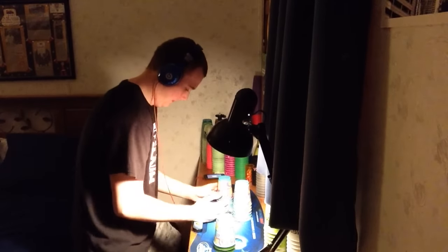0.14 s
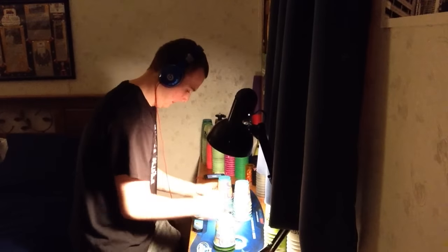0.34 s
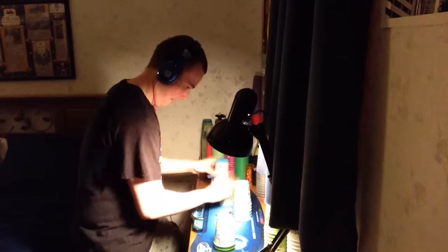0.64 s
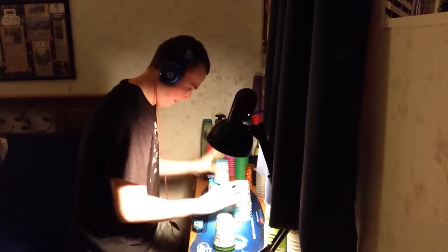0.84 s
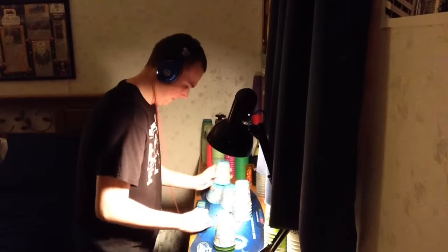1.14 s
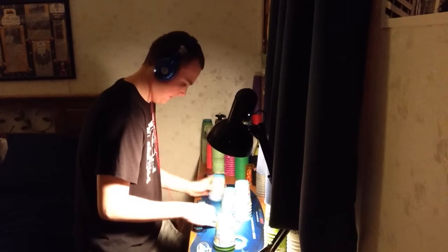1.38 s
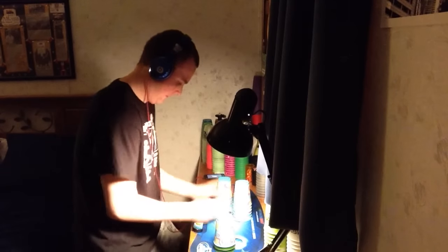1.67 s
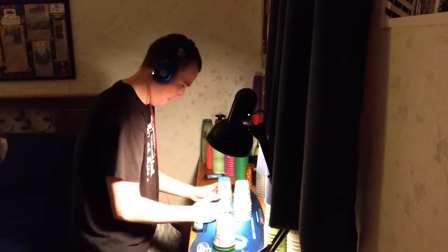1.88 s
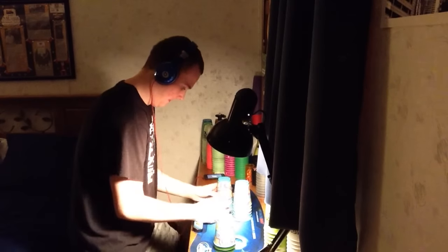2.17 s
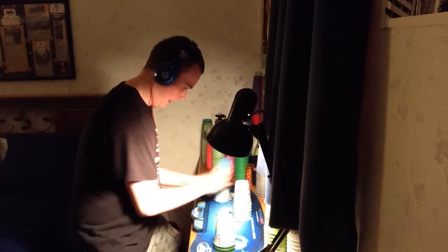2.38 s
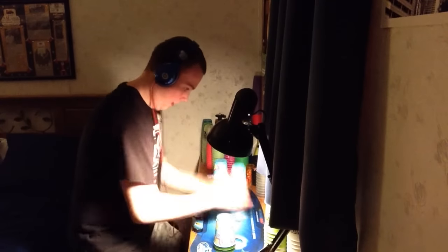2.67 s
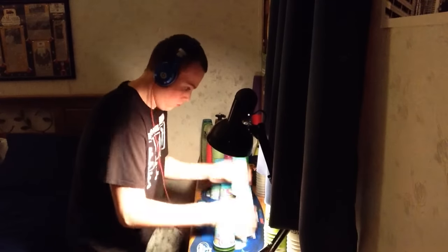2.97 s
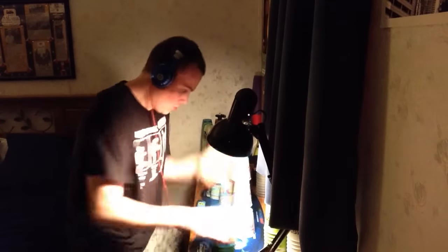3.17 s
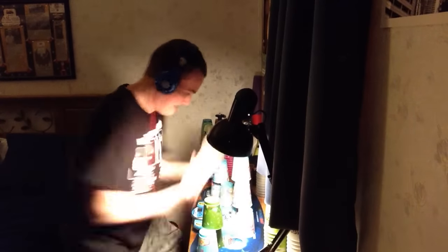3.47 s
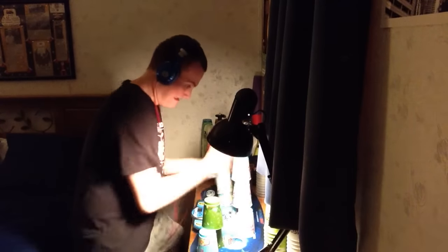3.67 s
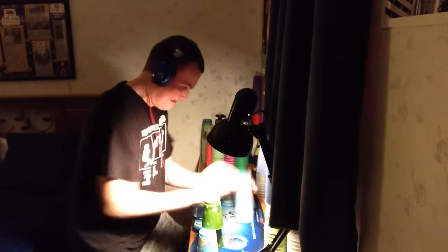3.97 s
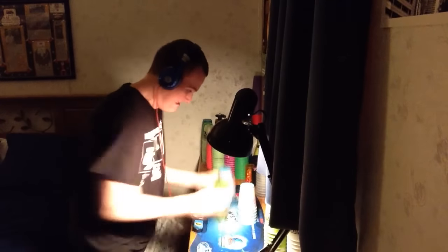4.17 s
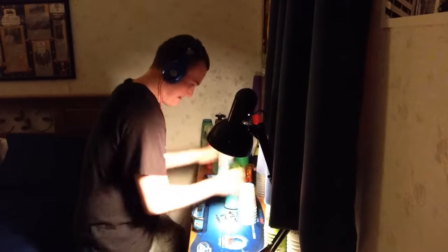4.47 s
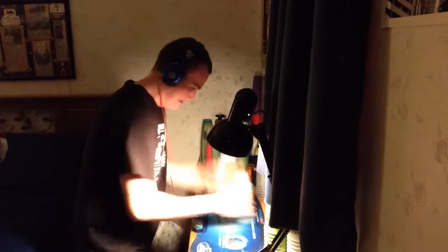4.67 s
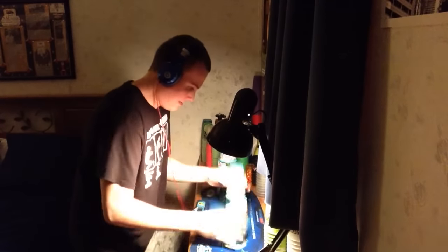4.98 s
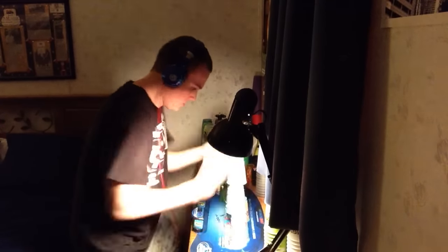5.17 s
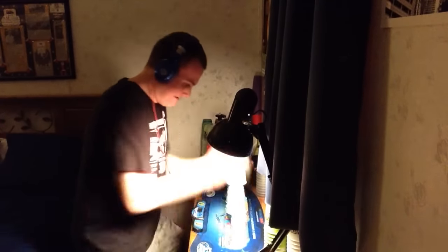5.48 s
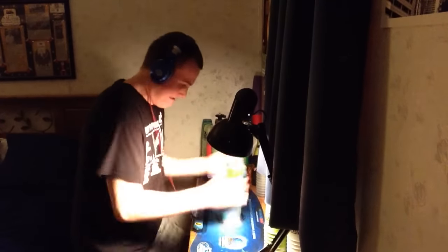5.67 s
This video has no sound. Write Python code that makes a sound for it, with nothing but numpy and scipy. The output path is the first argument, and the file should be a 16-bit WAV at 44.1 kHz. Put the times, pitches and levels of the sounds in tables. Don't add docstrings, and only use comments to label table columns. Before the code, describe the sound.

A quiet small bedroom with a faint low hum, heard through a small, thin-sounding microphone some distance away. Plastic cups slide softly and are set down around 0.2 and 0.45 seconds, then a loud hollow pop and clack lands near 0.7. Lighter cracks follow around 1.0 to 1.2, and another clacking group at 1.4 to 1.75. After a near pause, small ticks lead to a strong hollow pop at 2.55. From about 2.7 ticks and rattles build; sharp, higher pops hit at 3.1, and a hard cluster at 3.4. A pile tumbles in a rapid clatter at 3.8 to 3.9, followed by cracks and a desk thump near 4.05. More knocks come at 4.2 and 4.5, with a brief easing before dense hits and rattling slides from 5.05 to 5.5. A second, heavier pile collapse rattles down at 5.55, then scattered clicks finish, with short room echoes.

```python
import sys
import numpy as np
from scipy import signal
from scipy.io import wavfile

SR = 44100
rng = np.random.default_rng(int(sys.argv[2]) if len(sys.argv) > 2 else 0)


def boost_factor(decibels):
    exponent = np.asarray(decibels, float) / 20
    return 10 ** exponent


def master(y):
    cut = np.clip(np.atleast_2d(y).T, -1, 1)
    pcm = np.round(cut * 32767)
    wavfile.write(sys.argv[1], SR, pcm.astype(np.int16))


N = 257544


def rms_one(x):
    return x / np.sqrt(np.mean(x ** 2) + 1e-20)


def at_hz(points, hz):
    table_hz, values = np.transpose(points)
    return np.interp(np.log(hz), np.log(table_hz), values)


def cut(x, hz, kind):
    return signal.sosfilt(signal.butter(2, hz, kind, fs=SR, output="sos"), x)


def ring(force, hz, t60):
    r, w = boost_factor(-60 / (t60 * SR)), 2 * np.pi * hz / SR
    return signal.lfilter([0, np.sin(w)], [1, -2 * r * np.cos(w), r * r], force + 1e-18)


def ring_all(force, modes):
    return sum(boost_factor(db) * ring(force, hz, t60) for hz, db, t60 in modes)


def clicks(times, gains):
    out = np.zeros(N)
    np.add.at(out, np.clip((np.asarray(times) * SR).astype(int), 0, N - 1), gains)
    return out


def strike(times, level_db, modes, spread_db):
    luck = rng.standard_normal((len(times), 2, len(modes)))
    gains = boost_factor(level_db[:, None] + spread_db * luck[:, 0]) * np.sign(luck[:, 1])
    out = np.zeros(N)
    for k, (hz, db, t60) in enumerate(modes):
        out += boost_factor(db) * ring(clicks(times, gains[:, k]), hz, t60)
    return out


def octave_noise(size, shape):
    white = rng.standard_normal((2, size))
    edges = 35 * 2 ** np.arange(0, 9.1, .5)
    out = np.zeros(size)
    for k, (low, high) in enumerate(zip(edges, edges[1:])):
        out += shape(np.sqrt(low * high)) * cut(white[k % 2], [low, high], "band")
    return out


# frequency in Hz, level in dB per Hz.
HUSH = [(24, -63), (40, -33), (115, -18), (176, -2), (467, -20), (556, -3), (965, -20), (2260, -15),
        (2770, -22), (3300, -15), (3740, -18), (14500, -25), (16000, -34)]


def hush():
    air = rms_one(octave_noise(N, lambda hz: boost_factor(at_hz(HUSH, hz))))
    return boost_factor(-64.5) * (air + hum())


# frequency in Hz, level over the hush in dB, t60 in seconds.
HUM = [(180.8, -5, 0.25), (560, -9.5, 0.12)]


def hum():
    return sum(boost_factor(db) * rms_one(ring(rng.standard_normal(N), hz, t60)) for hz, db, t60 in HUM)


# start in seconds, end in seconds, rattle level in dB,
# rim ring over rattle in dB, hollow rub over rattle in dB.
SLIDE = [(-.1, 0.11, -44.5, -22, -7), (0.487, 0.69, -52, -11, 4), (0.983, 1.14, -56.5, 2, 12),
         (1.612, 1.713, -47.5, -15, -6), (2.388, 2.51, -57.5, 4, 0.5), (2.797, 3.01, -52, 2.5, 2),
         (3.104, 3.35, -43.5, 2.5, -2), (3.499, 3.692, -51.5, 15, 4), (3.564, 3.82, -43, -17, -4.5),
         (3.913, 4.1, -42.5, -13, 12), (4.225, 4.5, -61.5, 0, 5.5), (4.784, 4.989, -48.5, 3, -1),
         (5.113, 5.296, -39, -0.5, -0.5), (5.316, 5.442, -34.5, -24, 6), (5.628, 5.95, -38.5, -26, 4.5)]


def slide():
    t = np.arange(N) / SR
    hits = rng.random(N) < 5000 / SR
    grain_size = boost_factor(2.2 * np.minimum(rng.exponential(1, N), 4))
    grains = hits * grain_size * rng.choice([-1, 1], N)
    rattle = rms_one(cut(grains, [1500, 12000], "band"))
    rim = rms_one(ring_all(grains, RIM))
    rub = rms_one(ring(grains, 547.6, 0.046) + ring_all(grains, CUP_WALL))
    out = np.zeros(N)
    for start, end, db, rim_db, rub_db in SLIDE:
        stroke = np.sin(np.pi * np.clip((t - start) / (end - start), 0, 1))
        out += boost_factor(db) * stroke * (rattle + boost_factor(rim_db) * rim + boost_factor(rub_db) * rub)
    return out


# peak time in seconds, peak in dB, cavity in Hz.
SET_DOWNS = [(0.165, -30.5, 584), (0.177, -28.5, 660), (0.189, -26, 540), (0.446, -25.5, 700),
             (0.468, -26, 571), (0.521, -30.5, 610), (0.956, -33.5, 845), (1.077, -26, 824),
             (5.466, -8, 603), (1.444, -13, 650), (1.647, -28.5, 590), (1.694, -29.5, 620),
             (1.751, -22, 1137), (2.399, -35, 590), (2.418, -21.5, 657), (2.869, -26.5, 543),
             (2.9, -21.5, 640), (2.974, -25, 816), (3.011, -25.5, 560), (3.062, -32, 580),
             (3.585, -39, 620), (3.737, -23.5, 620), (3.775, -27.5, 660), (4.1, -12, 776),
             (4.233, -26.5, 566), (4.333, -24, 620), (5.224, -16.5, 1000), (5.379, -25, 563),
             (5.392, -10, 604), (5.454, -7.5, 636)]
# peak time in seconds, peak in dB, cavity in Hz.
BUMPS = [(0.373, -51.5, 880), (0.614, -37, 1034), (0.701, -5.5, 654), (0.976, -33, 625), (2.458, -32, 677),
         (2.716, -29, 500), (2.762, -21.5, 620), (3.082, -13.5, 1005), (3.124, -8, 1000),
         (3.176, -22.5, 935), (3.298, -36.5, 865), (3.436, -10.5, 637), (3.564, -41, 1300),
         (4.071, -17.5, 1040), (4.114, -20, 795), (4.519, -19.5, 1020), (4.547, -18, 980),
         (4.591, -13.5, 984), (4.718, -34, 650), (4.882, -34.5, 760), (4.911, -29.5, 584),
         (4.966, -36.5, 1030), (5.094, -20.5, 960), (5.148, -15, 890), (5.279, -15.5, 820),
         (5.288, -18, 780), (5.367, -26, 780), (5.681, -25, 567), (5.733, -39, 780), (5.799, -20, 510)]
# contact time in seconds, pop in dB, cavity in Hz, crack in dB.
KNOCKS = [(0.676, -6.5, 600, -22.5), (1.0375, -20.5, 860, -22), (1.154, -13, 966, -13),
          (1.1771, -15.5, 850, -14.5), (1.4042, -33.5, 640, -21), (1.6097, -30.5, 620, -15),
          (1.709, -20, 610, -21.5), (1.7299, -24, 640, -10.5), (2.519, -28, 570, -16),
          (2.561, -3, 628, -29), (2.849, -34, 780, -30), (2.9392, -25.5, 1000, -48), (3.1091, -9, 1090, -4),
          (3.327, -15, 1010, -42), (3.397, -16, 535, -37), (3.4141, -10.5, 584, -5),
          (3.617, -15.5, 605, -13), (3.9469, -15, 1060, -8), (4.0205, -10, 589, -4.5),
          (4.081, -13.5, 527, -3.5), (4.1785, -21.5, 573, -8), (4.48, -27.5, 620, -19.5),
          (4.5707, -9.5, 578, -8), (4.765, -33, 550, -18), (5.036, -24.5, 560, -45),
          (5.1177, -8, 690, -6.5), (5.293, -9, 627, -3.5), (5.3274, -10.5, 667, -6), (3.857, -12, 673, -9),
          (5.746, -20.5, 657, -30)]
# peak time in seconds, peak in dB, cavity in Hz.
NESTINGS = [(1.391, -44, 690), (1.429, -30, 610), (2.579, -12, 620), (3.101, -15, 560), (3.246, -34, 480),
            (3.606, -21.5, 776), (3.788, -31, 590), (4.014, -23, 616), (4.426, -39.5, 630),
            (4.773, -18, 550), (5.241, -24, 960), (5.831, -26, 527)]


def pop_rows():
    # events, wall modes over cavity tone (dB), length of a 600 Hz pop (ms), timed at contact
    kinds = [(KNOCKS, -6.5, 13.7, True), (falling_cups(), -5, 18, True),
             (SET_DOWNS, -19, 15.43, False), (BUMPS, -7, 16.6, False), (NESTINGS, -16, 15.86, False)]
    rows = []
    for table, wall_db, ms, struck in kinds:
        for s, db, hz, *_ in table:
            length = np.clip(ms * (600 / hz) ** 0.6, 4, 45) / 1000
            peak_s = s + struck * 0.328 * length
            rows.append((peak_s, db, hz, wall_db, length))
    return rows


def puffs(s, gain, hz, length_s):
    out = np.zeros(N + SR)
    for at, g, f, length in zip(s, gain, hz, length_s):
        t = np.arange(int(length * SR)) / SR
        start = int((at - .37 * length) * SR)
        swell = np.sin(np.pi * (t / length) ** .7) ** 2
        out[start:start + len(t)] += g * swell * np.sin(2 * np.pi * f * t)
    return out[:N]


# frequency in Hz, level in dB, t60 in seconds.
CUP_WALL = [(395, -24, 0.028), (453.4, -12.5, 0.051), (780, 7, 0.018), (904, -7.5, 0.038),
            (1030, -3.5, 0.081), (1220, 6, 0.0037), (1172, -6, 0.047), (1760, -14, 0.0043)]


def pops():
    s, peak_db, hz, wall_db, length_s = np.transpose(pop_rows())
    cavity = puffs(s, boost_factor(peak_db + 1.25), hz, length_s)
    wall = strike(s - 0.295 * length_s, peak_db + wall_db, CUP_WALL, spread_db=3.5)
    return cavity, cut(wall, [330, 1500], "band")


# time in seconds, peak in dB.
THUMPS = [(0.167, -23.5), (0.445, -22.5), (0.676, -20), (1.162, -30.5), (1.438, -23.5), (1.731, -19.5),
          (2.518, -37), (2.567, -17), (2.701, -33.5), (2.752, -30), (2.863, -35), (3.001, -27.5),
          (3.101, -32), (3.243, -26), (3.403, -13.5), (3.627, -28), (4.067, -9.5), (4.121, -36),
          (4.19, -20), (4.327, -28.5), (4.57, -26.5), (4.713, -30), (4.766, -31), (4.887, -32),
          (5.031, -25.5), (5.111, -27), (5.299, -14.5), (5.339, -20), (5.459, -9.5), (5.789, -39)]


def thump_rows():
    rows = list(THUMPS)
    for s, gap, _, _, desk_db in COLLAPSES:
        for cup in (len(PILE) // 2, len(PILE) - 1):
            rows.append((s + cup * gap, desk_db))
    return rows


# frequency in Hz, level in dB, t60 in seconds.
DESK = [(108, -1.5, 0.073), (181.5, 7, 0.057), (226.8, -5.5, 0.24), (350, -9.5, 0.1), (394, -1, 0.048)]


def thumps():
    s, peak_db = np.transpose(thump_rows())
    desk = strike(s, peak_db - 4.0, DESK, spread_db=4.0)
    return cut(cut(desk, 350, "low"), 370, "low")


# peak time in seconds, peak in dB, low clack over whole in dB.
CLACKS = [(0.3698, -37.5, -3.5), (0.4883, -46, -13), (0.509, -34, -6), (0.683, -3.5, -17),
          (1.437, -4.5, -0.5), (1.7293, -9, 6.5), (1.0051, -46.5, -11), (1.6378, -31, -12),
          (2.414, -45.5, 0), (2.57, -5.5, -9), (2.9394, -20, 4), (3.3287, -20, -31), (3.4038, -14, -2.5),
          (3.428, -16, 1), (4.1185, -11.5, -23), (4.5124, -19, -22), (5.0785, -23.5, -16),
          (5.3653, -10.5, -3), (5.3869, -12, 4), (5.4602, -3, -4), (5.6384, -8.5, 0), (5.75, -16, -1.5),
          (5.7672, -24.5, 4), (5.8232, -19, 3)]
# peak time in seconds, peak in dB.
TICKS = [(0.5629, -33.5), (0.5804, -24.5), (0.6103, -30), (0.9535, -40.5), (1.092, -29.5), (1.2943, -33.5),
         (1.3803, -33), (3.889, -14.5), (1.6885, -34), (2.2473, -46), (2.3876, -39), (2.4463, -33),
         (2.7009, -25), (2.7413, -13.5), (2.864, -28.5), (2.9067, -24), (3.013, -25), (3.0775, -12.5),
         (3.241, -16.5), (3.2893, -16.5), (3.7274, -14), (3.997, -15), (4.329, -35.5), (4.3889, -37),
         (4.7128, -24.5), (5.019, -39), (5.0528, -17), (5.2728, -16.5), (5.4424, -9.5), (5.7845, -10.5)]


def crack_rows():
    rows = [(s, db, -3, -6.5) for s, _, _, db in KNOCKS]
    rows += [(s, db, -6, -2) for s, _, _, db in falling_cups()]
    rows += [(s, db, -2.5, -7) for s, db in TICKS]
    rows += [(s, db, -8, clack_db) for s, db, clack_db in CLACKS]
    return rows


# frequency in Hz, level in dB, t60 in seconds.
RIM = [(2300, -5, .012), (2900, 3, .003), (4400, 3, .002)]


def cracks():
    s, peak_db, bright_db, clack_db = np.transpose(crack_rows())
    fall, rise = boost_factor(-60 / (.016 * SR)), boost_factor(-60 / (.008 * SR))
    edges = 1400 * 2 ** (np.arange(15) / 4)
    splinters = rng.standard_normal((2, N)) * boost_factor(6.1 * rng.standard_normal(N))
    favour_db = 3.5 * rng.standard_normal((len(s), len(edges)))
    out = np.zeros(N)
    for k, band in enumerate(zip(edges, edges[1:])):
        if k < 4:
            part_db = clack_db - 3.0
        elif k < 8:
            part_db = -7.5
        else:
            part_db = bright_db - 1.0 * (k - 6)
        blows = clicks(s, boost_factor(peak_db + part_db + favour_db[:, k] - 9.5))
        burst = signal.lfilter([1 - rise], np.convolve([1, -fall], [1, -rise]), blows)
        out += burst * rms_one(cut(splinters[k % 2], band, "band"))
    return out + boost_factor(-51.5) * ring_all(out, RIM)


# frequency in Hz, level in dB, t60 in seconds.
LIP = [(1884, -9, 0.035), (2337, -7.5, 0.045), (3280, -5.5, 0.03), (4050, -3.5, 0.029), (5400, -2.5, 0.02)]


def lips():
    s, peak_db, *_ = np.transpose(crack_rows())
    return strike(s + 0.001499, peak_db - 17.5, LIP, spread_db=4.5)


# start in seconds, gap between cups in seconds, pop in dB, crack in dB, desk in dB.
COLLAPSES = [
    (3.799, 0.0152, -13.5, -5, -15.5),
    (5.54, 0.0165, -12, -4, -6.5),
]
# cavity in Hz, pop in dB, crack in dB.
PILE = [
    (620, -5, -8),
    (1030, 5, 6),
    (560, -2.5, -3),
    (550, -0.6, 3.5),
    (714, -6, -4),
    (515, -3, -6.5),
    (700, -5.5, 1.5),
]


def falling_cups():
    rows = []
    for s, gap, pop_db, crack_db, _ in COLLAPSES:
        for k, (hz, pop, crack) in enumerate(PILE):
            rows.append((s + k * gap, pop_db + pop, hz, crack_db + crack))
    return rows


# frequency in Hz, t60 in seconds.
ROOM_T60 = [(100, 0.39), (500, 0.2), (2000, 0.19), (8000, 0.19)]
# delay in seconds, level in dB.
ECHOES = [(.004, -10.5), (.011, -25.5)]


def room(x, tail_db):
    t = np.arange(SR // 2) / SR
    tail = octave_noise(len(t), lambda hz: boost_factor(-60 * t / at_hz(ROOM_T60, hz)))
    tail *= 1 - np.exp(-t / 0.003)
    answer = boost_factor(tail_db) * tail / np.sqrt(np.sum(tail ** 2))
    direct = (0.00056, 0.0035)
    for lag, db in [direct] + list(ECHOES):
        answer[int(lag * SR)] += boost_factor(db)
    return signal.fftconvolve(x, answer)[:N]


def wash(x, tail_db):
    white = rng.standard_normal((2, N))
    edges = 315 * 2 ** (np.arange(18) / 3)
    fill = np.exp(-1 / (0.0025 * SR))
    out = x.copy()
    for k, band in enumerate(zip(edges, edges[1:])):
        keep = boost_factor(-120 / (at_hz(ROOM_T60, band[0]) * SR))
        power = signal.lfilter([1 - fill], [1, -fill], cut(x, band, "band") ** 2)
        stored = signal.lfilter([1 - keep], [1, -keep], power * boost_factor(2 * tail_db))
        out += np.sqrt(stored) * rms_one(cut(white[k % 2], band, "band"))
    return out


def scene():
    cavity, wall = pops()
    soft = room(cavity + thumps() + slide(), tail_db=-6.5)
    hard = wash(cracks() + lips() + wall, tail_db=2.0)
    return (soft + hard + hush())[None]


def band_limit(x):
    return signal.sosfilt(signal.butter(12, 16450, fs=SR, output="sos"), x)


def record(dry):
    thin = cut(cut(dry, 200, "high"), 75, "high")
    rounded = .76 * np.tanh(thin / .76)
    top_cut = signal.cheby2(10, 30, 15700, fs=SR, output="sos")
    return band_limit(signal.sosfilt(top_cut, rounded))


dry = scene()
out = record(dry)
master(out)
```